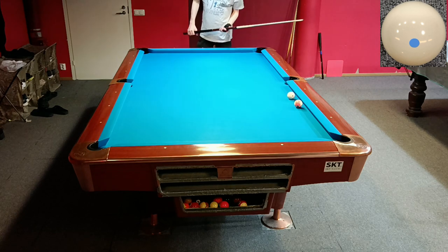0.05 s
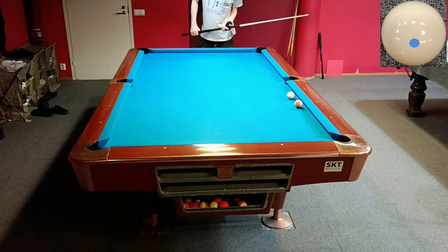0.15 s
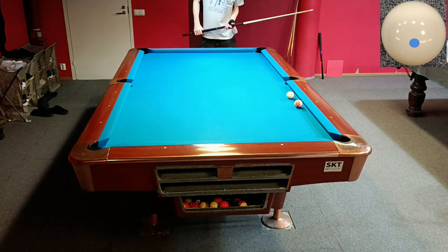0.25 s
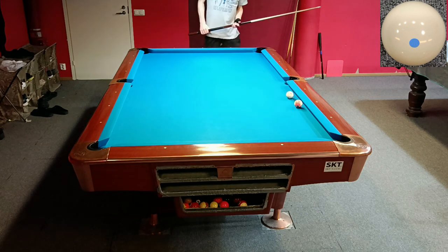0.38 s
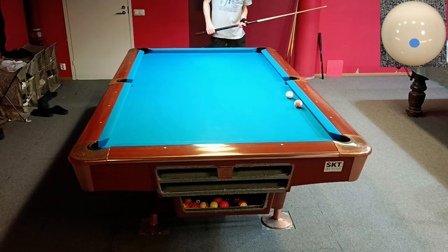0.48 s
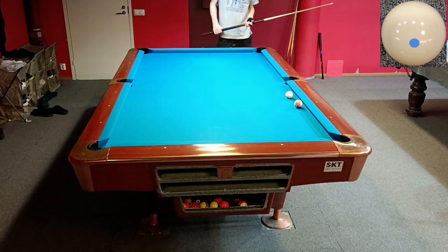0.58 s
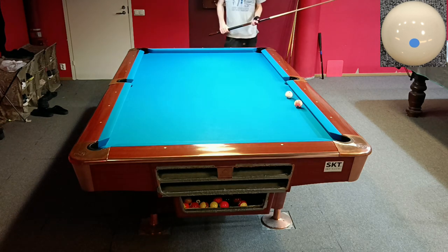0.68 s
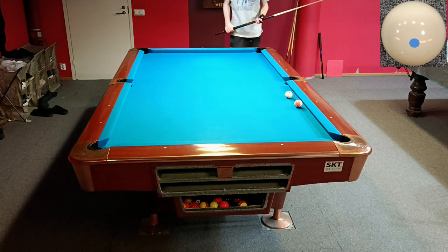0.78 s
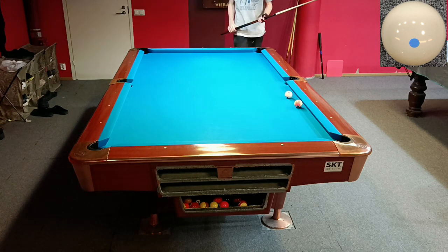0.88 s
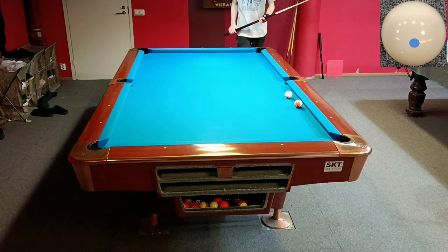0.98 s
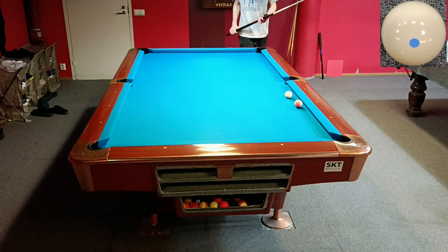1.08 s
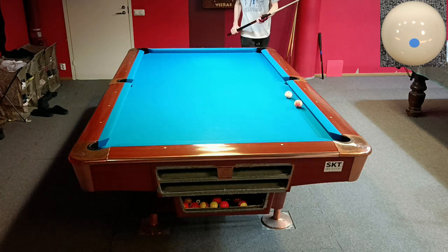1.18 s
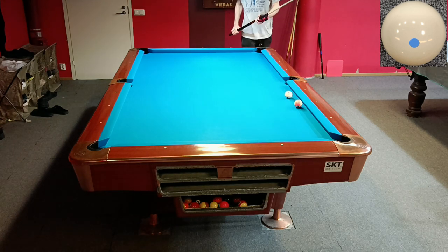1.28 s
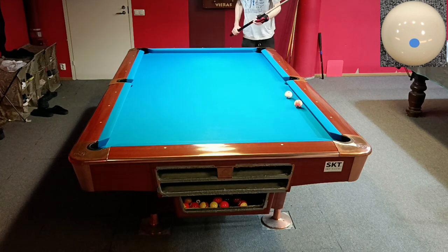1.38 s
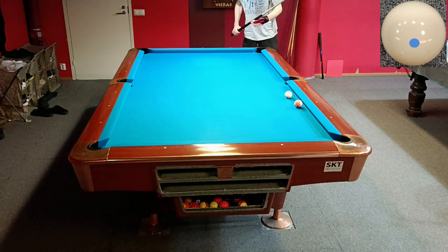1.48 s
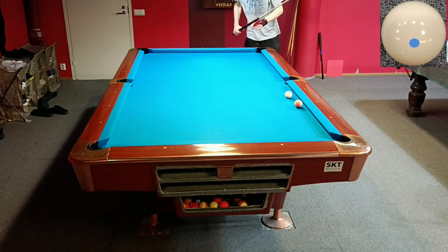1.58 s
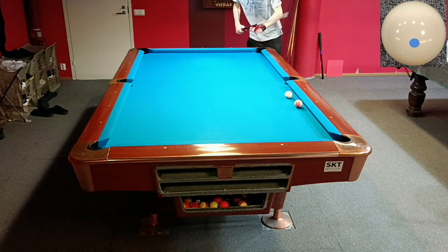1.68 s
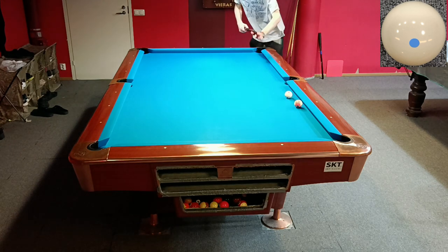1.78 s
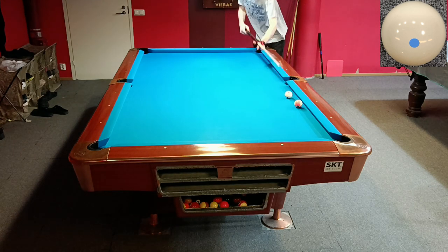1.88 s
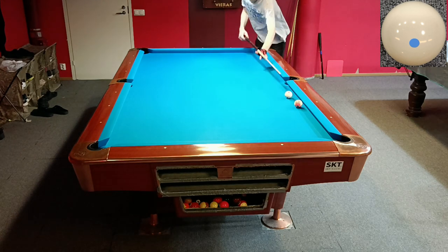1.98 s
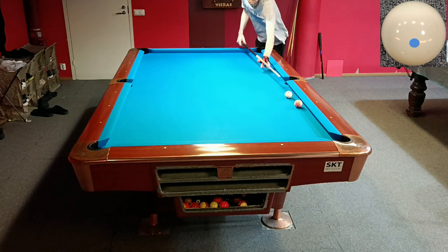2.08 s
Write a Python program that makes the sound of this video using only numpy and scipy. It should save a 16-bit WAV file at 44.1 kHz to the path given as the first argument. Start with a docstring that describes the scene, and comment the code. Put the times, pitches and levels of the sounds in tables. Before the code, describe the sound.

Pool ball rolling down a return channel inside a table, hollow knocks, hard landing, clacks in tray

```python
"""A stereo pair at a pool table: over the hall's low hush a potted ball knocks down the return channel
inside, as filtered noise bursts with ringing modes, and the player's soft sine footfalls thump close by.
The ball rumbles on as dense random bumps, lands on the last rail with a hard knock and rolls a little way.
It clacks into the balls in the tray, which jostle and settle; a brief rustle of grainy noise follows.
The diffuse tail of the hall, decaying band by band, surrounds them all."""
import sys
import numpy as np
from scipy import signal
from scipy.fft import rfft, irfft
from scipy.io import wavfile

SR = 44100
rng = np.random.default_rng(int(sys.argv[2]) if len(sys.argv) > 2 else 0)


def file_out(sig):
    """Save sig as 16-bit WAV at sys.argv[1]."""
    # one column per channel
    cols = np.atleast_2d(sig).T
    # limit, then scale
    lim = np.clip(cols, -1, 1)
    pcm = np.round(lim * 32767).astype(np.int16)
    wavfile.write(sys.argv[1], SR, pcm)


N = 92610
LEAD = SR // 4  # samples of run-in, dropped at the end
T = np.arange(-LEAD, N) / SR  # seconds on the scene's clock
AGE = np.arange(SR) / SR  # seconds since a blow

# Ball against the channel. Each row: start in seconds, level in dB, low edge in Hz, top edge in Hz,
# level of the bright tick in dB.
KNOCKS = [(-.09, -26.5, 110, 2500, -50), (0.2021, -28.5, 620, 1750, -77.5), (0.215, -26, 220, 1510, -60),
          (.231, -26, 170, 2840, -54), (0.246, -29.5, 174, 2600, -73), (.278, -22.5, 110, 700, -75.5),
          (.400, -30, 520, 1630, -54), (0.411, -29, 520, 1507, -61.5), (.429, -25, 220, 1300, -57.5),
          (0.487, -26, 180, 900, -67.5), (.517, -29, 180, 1200, -66.5), (0.554, -30.5, 160, 1100, -72),
          (0.589, -31.5, 160, 1410, -70), (.632, -25, 100, 600, -74)]
# Ball landing on the last rail: start in seconds, level in dB, level of the bright tick in dB.
LANDING = (1.0503, -20.5, -48.5)
# Ball against ball in the tray. Each row: start in seconds, level in dB, top edge in Hz, bright tick in dB.
CLACKS = [(1.1838, -30, 2800, -58), (1.1868, -26.5, 2840, -67), (1.1934, -29, 2750, -76),
          (1.226, -41, 2670, -62), (1.24, -67, 2700, -73), (1.3076, -35, 1960, -68),
          (1.576, -59, 1900, -83), (1.62, -65, 2000, -97)]
# Ringing of channel and cabinet. Each row: frequency in Hz, level in dB, time to fall 60 dB in seconds.
CHANNEL_MODES = [(124, -5, .8), (167, -7, .6), (226, -6, .45), (251, 0, .75), (268, -7, .4), (306, -2, .45),
                 (350, 3, .55), (403, -4.5, .45), (522, -15, .4), (565, -12, .4), (698, -10, .35),
                 (775, -13, .3), (993, -19, .3), (1325, -20, .35)]
# Ringing of the last rail and tray. Each row: frequency in Hz, level in dB, time to fall 60 dB in seconds.
RAIL_MODES = [(128.6, -8.5, 0.37), (243.3, -5.5, 0.19), (298.2, 4.5, 0.068), (390, -10, 0.05),
              (399.8, -2.5, 0.17), (440, -5, 0.3), (555, -19, 0.3), (685.5, -3.5, 0.027),
              (708.3, -10.5, 0.18), (1121, -11.5, 0.26), (1414, -18, 0.19)]
KNOCK_SCATTER_S = .014  # decay of the reflections in the channel


def amp(db):
    """Decibels to gain."""
    return 10 ** (np.asarray(db) / 20)


def unit(x):
    """Scale a response to unit energy per channel."""
    return x / np.sqrt(np.mean(np.sum(x ** 2, axis=-1)))


def along(points, hz):
    """Read (Hz, value) points on a log-frequency axis."""
    f, v = np.array(points, float).T
    return np.interp(np.log(hz + 1e-9), np.log(f), v)


def through(x, response):
    """Convolve, keeping the length."""
    wet = signal.fftconvolve(np.atleast_2d(x), np.atleast_2d(response), axes=-1)
    return wet[:, :np.shape(x)[-1]]


def colour(points, size=4096):
    """Causal (minimum-phase) response with the given (Hz, dB) spectrum, by folding its cepstrum."""
    gain = amp(along(points, np.fft.rfftfreq(size, 1 / SR)))
    cepstrum = irfft(np.log(gain))
    cepstrum[1:size // 2] *= 2
    cepstrum[size // 2 + 1:] = 0
    return irfft(np.exp(rfft(cepstrum)))


def edge(x, hz, kind, order=2):
    """Low-pass or high-pass."""
    sos = signal.butter(order, min(hz, SR / 2 - 100), kind, fs=SR, output="sos")
    return signal.sosfilt(sos, x)


def one_second(x):
    """Pad or trim a stereo blow to one second, so that it can carry a tail."""
    return np.pad(x, ((0, 0), (0, SR)))[:, :SR]


def diffuse(size):
    """Stereo noise whose likeness between the sides varies with frequency, as in diffuse hall sound."""
    # Side against mid. Each row: frequency in Hz, level in dB.
    side_points = [(60, -7), (125, -29.5), (280, -7.5), (550, -7.5), (1200, -0.5), (2300, -3), (5000, -0.5)]
    mid, side = rfft(rng.standard_normal((2, size)))
    width = amp(along(side_points, np.fft.rfftfreq(size, 1 / SR)))
    left_right = np.array([mid + width * side, mid - width * side])
    return irfft(left_right / np.sqrt(1 + width ** 2), size)


def scatter(decay_s, rise_s=0.00046, size=4096, count=4):
    """Burst of close reflections: decaying noise, repeatedly flattened in spectrum."""
    env = np.exp(-AGE[:size] / decay_s)
    burst = diffuse(size) * env
    for _ in range(count):
        spectrum = rfft(burst)
        flat = irfft(spectrum / (abs(spectrum) + 1e-12))
        burst = flat * np.minimum(1, 10 * env)  # hold the flattened burst to a decay
    return unit(burst * (1 - np.exp(-AGE[:size] / rise_s)))


def ring(modes):
    """Decaying sine modes, each weighted by its energy, with a short rise."""
    rise_s = 0.00068
    tones = 0
    for hz, db, t60 in modes:
        decay = np.exp(-np.log(1000) * AGE / t60)
        tones = tones + amp(db) / np.sqrt(t60) * np.sin(2 * np.pi * hz * AGE) * decay
    return unit(tones * (1 - np.exp(-(AGE / rise_s) ** 2)))


def add(out, s, sound, db):
    """Place a blow; its level is its energy spread over 10 ms."""
    i = int(s * SR) + LEAD
    sound = sound[..., :len(T) - i]
    out[:, i:i + sound.shape[-1]] += sound * amp(db) * np.sqrt(SR / 100)


def hall_response(count=14):
    """Diffuse tail of the hall: noise in overlapping bands, each decaying at its own rate."""
    # Each row: frequency in Hz, time to fall 60 dB in seconds.
    decay_points = [(60, 1), (160, 1.9845), (300, 0.9366), (700, 0.65), (1500, 0.5756), (2800, 0.5564),
                    (6000, 0.526), (14000, 0.1565)]
    build_s = 0.0043
    noise, hz = rfft(diffuse(SR)), np.fft.rfftfreq(SR, 1 / SR)
    centres, tail = np.geomspace(50, 15000, count), 0
    for centre, mask in zip(centres, np.eye(count)):
        band = irfft(noise * along(list(zip(centres, mask)), hz))
        tail = tail + band * np.exp(-np.log(1000) * AGE / along(decay_points, centre))
    return unit(tail * (1 - np.exp(-AGE / build_s)))


def in_hall(x, hall, wet_db):
    """Direct sound plus the hall's tail; a lower wet level sounds nearer."""
    return x + amp(wet_db) * through(x, hall)


def room_tone():
    """Low steady hush of the hall: coloured diffuse noise."""
    # Each row: frequency in Hz, level in dB.
    hush_points = [(25, -10), (50, -29), (80, 6), (130, 3.5), (250, 3), (400, -8.5), (700, -13),
                   (1500, -23.5), (3000, -26), (6000, -36.5), (15000, -43.5)]
    level_db = -63
    return amp(level_db) * through(diffuse(len(T)), unit(colour(hush_points)))


def knocks(hall, ring_db, wet_db, lining_db=-2):
    """Hollow blows on the channel: a wooden burst and ringing modes between each blow's own band edges."""
    # Colour of the wood. Each row: frequency in Hz, level in dB.
    wood_points = [(40, -8.5), (150, 6.5), (300, 5.5), (520, -6.5), (730, 2), (1000, -9.5), (1500, -9),
                   (2200, -11.5), (3500, -16.5), (8000, -45)]
    # Short hollow ring of the channel's lining where the ball strikes it.
    # Each row: frequency in Hz, level in dB, time to fall 60 dB in seconds.
    lining_modes = [(328.6, -3, 0.062), (696.5, 2.5, 0.055), (831.6, -3, 0.13), (977, -3.5, 0.15),
                    (1077, -5, 0.14), (1317, -7.5, 0.11), (1608, -15, .1), (1737, -8, .1), (2116, -11, .08)]
    rise_s = 0.0028  # blows inside the cabinet take a moment to get out
    out = np.zeros((2, len(T)))
    ringing = amp(ring_db) * ring(CHANNEL_MODES) + amp(lining_db) * ring(lining_modes)
    for s, db, low_hz, top_hz, _ in KNOCKS:
        burst = scatter(KNOCK_SCATTER_S, rise_s)
        wood = one_second(through(burst, unit(colour(wood_points))))
        blow = in_hall(wood, hall, wet_db) + ringing
        blow = edge(blow, low_hz, "high")
        blow = edge(blow, top_hz, "low", order=5)
        add(out, s, unit(blow), db)
    return out


def ticks():
    """The faint bright edge of every contact, smeared when it comes from deep in the channel."""
    # Each row: frequency in Hz, level in dB.
    tick_points = [(500, 17.5), (3000, 2.5), (5000, 5.5), (7500, -1), (10000, -3), (15000, -6.5)]
    channel_rise_s = 0.0052
    touch_lead_s = 0.00097  # the ball's edge ticks on the rail just before its weight lands
    out = np.zeros((2, len(T)))
    for s, *_, db in KNOCKS:
        add(out, s, edge(scatter(KNOCK_SCATTER_S, channel_rise_s), hz=11000, kind="low"), db)
    add(out, LANDING[0] - touch_lead_s, scatter(decay_s=0.0069), LANDING[-1])
    for s, *_, db in CLACKS:
        add(out, s, scatter(decay_s=0.0056), db)
    return through(out, unit(colour(tick_points)))


def footfalls():
    """Dull thumps on a carpeted floor: a low sine that swells and dies away quickly."""
    # The player's soft footfalls. Each row: start in seconds, level in dB.
    steps = [(.038, -39), (0.14, -44.5)]
    step_hz, step_s = 74, .014  # pitch, and time to the peak of the swell
    out = np.zeros((2, len(T)))
    for s, db in steps:
        swell = AGE * np.exp(-AGE / step_s)
        add(out, s, unit(np.sin(2 * np.pi * step_hz * AGE) * swell), db)
    return out


def rolling(strength, body, modes, hall, ring_db, wet_db):
    """The ball runs over dense small bumps, which shake the cabinet and ring its modes."""
    bumps_per_s, spread_db = 1500, 2  # mean rate, and spread of the bump sizes
    chance, size = rng.random(len(T)), rng.standard_normal(len(T))
    bumps = (chance < bumps_per_s / SR) * amp(spread_db * size) * rng.choice([-1, 1], len(T))
    strength_db = np.interp(T, *np.array(strength).T, left=-120, right=-120)
    force = bumps / bumps.std() * amp(strength_db)
    shaken = through(force, scatter(decay_s=0.0072))
    wood = through(shaken, unit(colour(body)))
    ringing = through(edge(force, 130, "high"), ring(modes))
    mixed = in_hall(wood, hall, wet_db) + amp(ring_db) * ringing
    return mixed / np.hypot(1, amp(ring_db))


def channel_roll(hall):
    """The ball rumbles along the channel, ringing channel and cabinet."""
    # Strength of the rolling. Each row: time in seconds, level in dB.
    strength = [(.21, -43.5), (.235, -25), (.30, -33), (.39, -28.5), (.46, -25.5), (.53, -24.5), (.60, -35),
                (.66, -46.5), (.75, -52.5), (.86, -60), (.95, -58.5)]
    # Colour of the rumble. Each row: frequency in Hz, level in dB.
    body = [(30, -32), (70, -11.5), (125, -12), (195, -12.5), (240, -0.5), (320, 6), (420, -3), (560, -4),
            (800, -17), (1300, -21.5), (2200, -27), (3200, -40), (4300, -51.5), (7000, -60), (11000, -80),
            (15000, -84)]
    return rolling(strength, body, CHANNEL_MODES, hall, ring_db=0.5, wet_db=-8)


def landing(hall, ring_db, wet_db):
    """The ball drops onto the last rail: a hard knock and the rail's short ring."""
    # Colour of the knock. Each row: frequency in Hz, level in dB.
    thud_points = [(40, -36.5), (130, -24.5), (190, -23), (300, 5.5), (420, 3), (540, 7), (730, 1),
                   (1100, -7), (1500, -12), (2200, -17.5), (3500, -39.5), (8000, -72), (15000, -77)]
    thud, rung = np.zeros((2, 2, len(T)))
    s, db, _ = LANDING
    add(thud, s, through(scatter(decay_s=0.014), unit(colour(thud_points))), db)
    add(rung, s, unit(edge(ring(RAIL_MODES), 210, "high", order=4)), db + ring_db)
    return in_hall(thud + rung, hall, wet_db)


def rail_roll(hall):
    """The ball rolls a little way along the last rail, ringing rail and tray."""
    # Strength of the rolling. Each row: time in seconds, level in dB.
    strength = [(1.075, -36.5), (1.105, -27.5), (1.18, -31), (1.22, -33.5), (1.28, -42.5), (1.38, -65),
                (1.50, -64), (1.57, -76)]
    # Colour of the rolling. Each row: frequency in Hz, level in dB.
    body = [(30, -40.5), (70, -22.5), (125, -10), (190, -22), (240, -4), (290, 1), (430, -2.5),
            (560, -12.5), (750, -10), (1100, -11), (1500, -18), (2200, -27.5), (4000, -48), (7500, -51),
            (11000, -65), (15000, -67)]
    return rolling(strength, body, RAIL_MODES, hall, ring_db=5, wet_db=-12)


def clacks(ring_db):
    """Ball meets ball: a short crack and the tray's faint ring, each contact under its own top edge."""
    # Colour of the crack. Each row: frequency in Hz, level in dB.
    crack_points = [(100, -15), (500, -1.5), (1000, -1.5), (1500, 3.5), (2000, 8.5), (2550, 5),
                    (3100, -1.5), (3900, -10), (8000, -36.5)]
    # Ringing of the tray. Each row: frequency in Hz, level in dB, time to fall 60 dB in seconds.
    tray_modes = [(1114, 1, 0.37), (1464, -0.5, 0.5), (1670, 12, .3), (1880, 0.5, .3), (1845, -6, 0.27),
                  (2220, 10, .3), (2300, 1.5, 0.33), (2397, -6, 0.1)]
    out, tray = np.zeros((2, len(T))), ring(tray_modes)
    for s, db, top_hz, _ in CLACKS:
        crack = one_second(through(scatter(decay_s=0.0058), unit(colour(crack_points))))
        clack = edge(crack + amp(ring_db) * tray, top_hz, "low", order=7)
        add(out, s, unit(clack), db)
    return out


def rustles(grain_db=5.5):
    """Short grainy, slightly creaky rubs as the player bends to the table: noise of fluctuating level."""
    # Each row: start in seconds, level in dB before the grain, length in seconds, top edge in Hz.
    rubs = [(1.854, -68.5, 0.021, 6940), (1.877, -66.5, 0.032, 7280), (1.93, -69.5, 0.057, 14000)]
    # Colour of the rub. Each row: frequency in Hz, level in dB.
    rub_points = [(200, -2), (700, 4.5), (1300, 4.5), (2200, 7), (3700, 0), (6000, -4), (8000, -8),
                  (10000, -10.5), (15000, -29.5)]
    # Thin creak inside the rubs. Each row: frequency in Hz, level in dB, time to fall 60 dB in seconds.
    creak_modes = [(2040, 0, .07), (2620, -1, .07), (3680, 1, .07), (4550, -9, .04), (5850, -7, .05),
                   (7400, -11, .03)]
    creak_db = -8
    out = 0
    for s, db, length_s, top_hz in rubs:
        age = np.maximum(T - s, 0) / (length_s / 2)
        swell = age * np.exp(1 - age)  # peaks at half the length
        wander = np.interp(T, T[::100], rng.standard_normal(len(T[::100])))
        rub = diffuse(len(T)) * amp(grain_db * wander) * swell * amp(db)
        out = out + edge(rub, top_hz, "low", order=3)
    return through(out, unit(colour(rub_points))) + amp(creak_db) * through(out, ring(creak_modes))


def scene():
    """All sources in the one hall."""
    hall = hall_response()
    mix = (room_tone()
           + knocks(hall, ring_db=-6, wet_db=-3.5)
           + in_hall(ticks(), hall, wet_db=-6.5)
           + in_hall(footfalls(), hall, wet_db=-16.5)
           + channel_roll(hall)
           + landing(hall, ring_db=-0.5, wet_db=-7)
           + rail_roll(hall)
           + in_hall(clacks(ring_db=-16.5), hall, wet_db=-5.5)
           + in_hall(rustles(), hall, wet_db=-3))
    return mix[:, LEAD:]


def record(dry):
    """Each microphone has its own colour; the top is cut steeply."""
    # Each row: frequency in Hz, left minus right in dB.
    balance = [(60, -1.1), (250, 1.3), (500, 0.9), (1000, 1.5), (2200, 1), (3500, -1.5), (6000, -3),
               (8000, -2.5), (14000, 9.5)]
    top_hz = 15800
    sides = []
    for x, sign in zip(dry, (1, -1)):
        tilt = [(hz, sign * db / 2) for hz, db in balance]  # half the difference on each side
        sides.append(through(x, colour(tilt))[0])
    steep = signal.ellip(10, .2, 70, top_hz, fs=SR, output="sos")
    return signal.sosfilt(steep, np.array(sides))


dry = scene()
out = record(dry)
file_out(out)
```